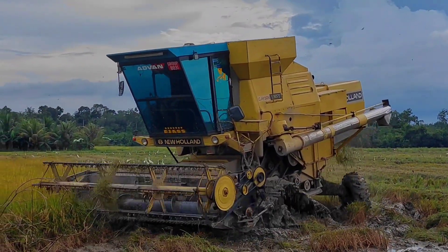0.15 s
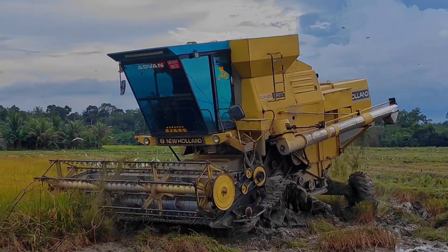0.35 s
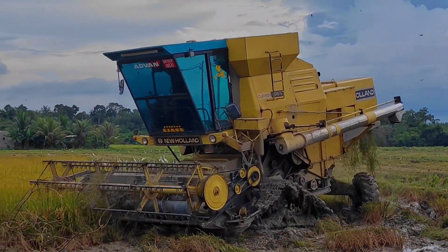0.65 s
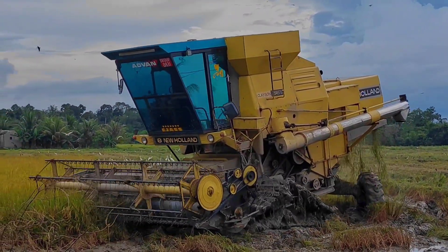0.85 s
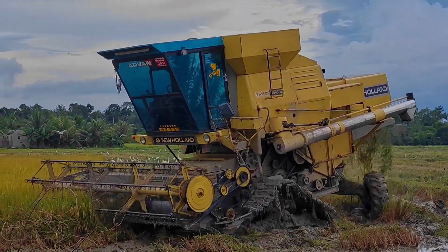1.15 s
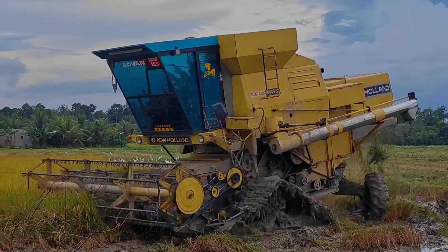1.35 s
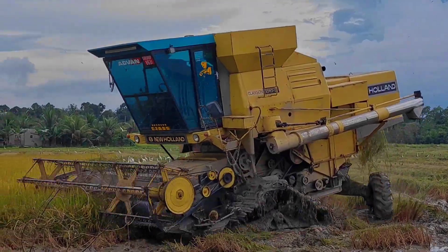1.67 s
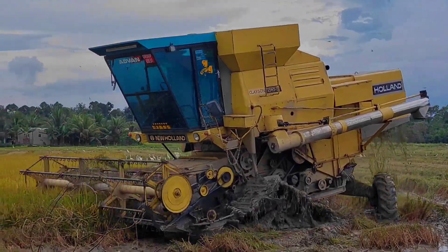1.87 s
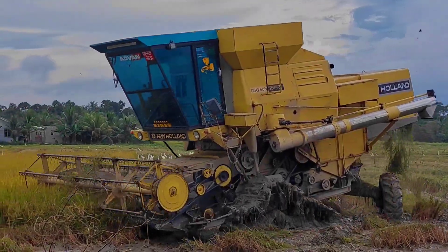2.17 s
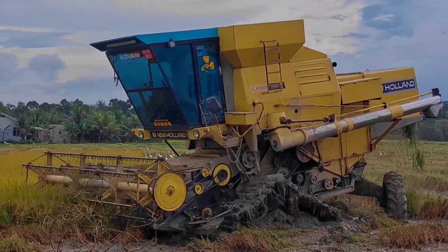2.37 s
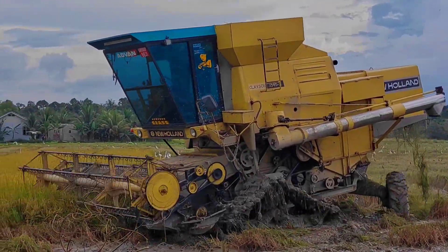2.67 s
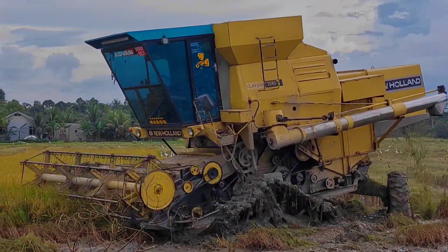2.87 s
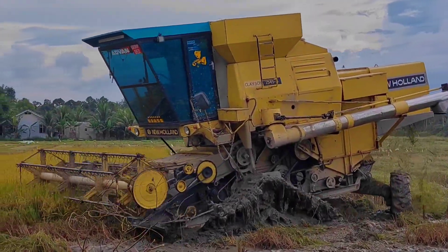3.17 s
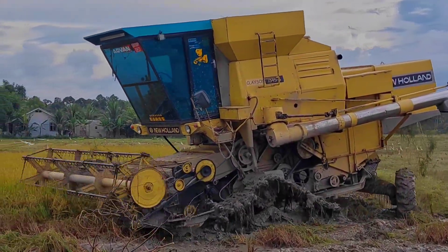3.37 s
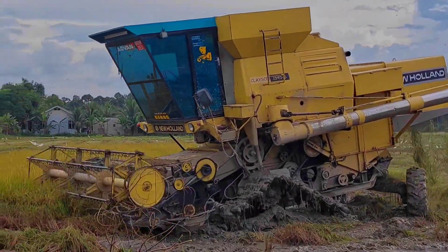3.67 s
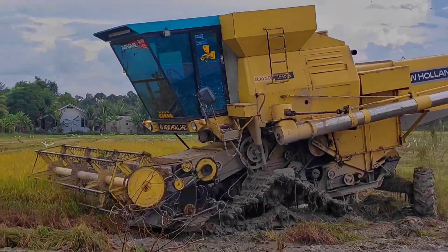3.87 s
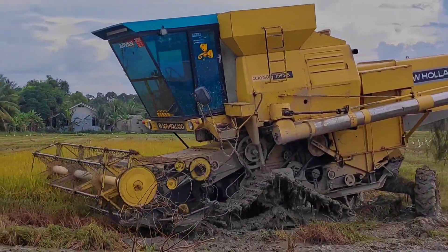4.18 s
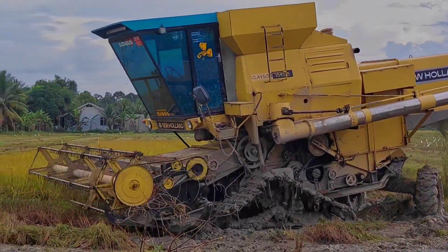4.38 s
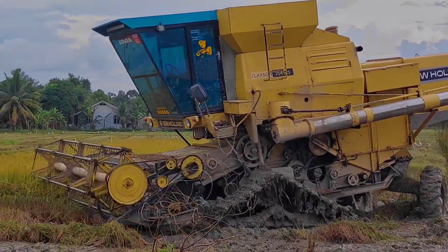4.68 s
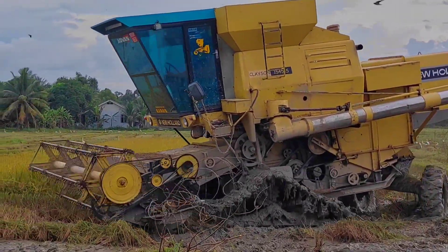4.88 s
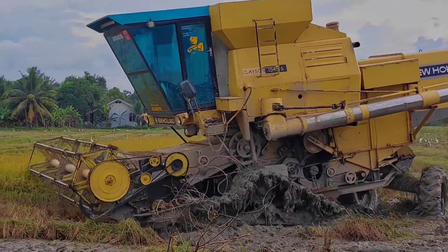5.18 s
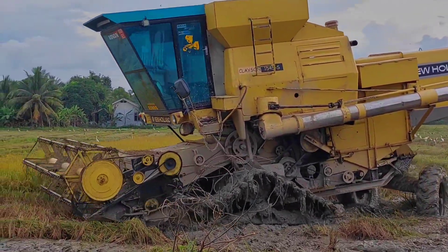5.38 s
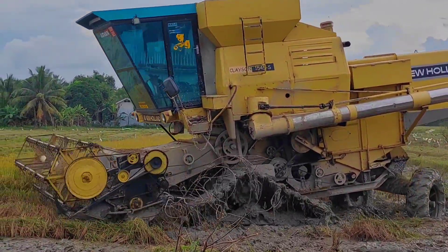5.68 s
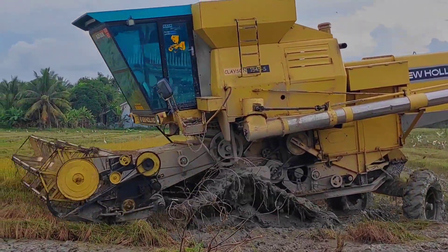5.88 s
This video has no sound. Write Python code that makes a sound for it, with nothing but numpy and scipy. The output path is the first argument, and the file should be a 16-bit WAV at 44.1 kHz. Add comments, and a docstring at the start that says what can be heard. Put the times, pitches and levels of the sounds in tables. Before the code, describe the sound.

A combine harvester crawls past with a loud, steady diesel drone, a low rumble and a growing metallic clatter.

```python
"""A muddy rice field: a combine harvester crawls past, its six-cylinder diesel held at working speed.
The exhaust radiates harmonics of the firing rate, the threshing gear rumbles, and fan and straw hiss.
Each firing is an impulse that makes the block thud and the engine covers ring at their resonances.
The clatter, with its echo off the wet ground, grows and changes colour as the engine bay comes round.
Two microphone ports hear the machine, and a limiter holds the peaks."""
import sys
import numpy as np
from scipy import signal
from scipy.fft import rfft, irfft
from scipy.io import wavfile
from scipy.ndimage import uniform_filter1d, minimum_filter1d

SR = 44100
rng = np.random.default_rng(int(sys.argv[2]) if len(sys.argv) > 2 else 0)


def write(x):
    x = np.atleast_2d(x).T
    wavfile.write(sys.argv[1], SR, np.round(np.clip(x, -1, 1) * 32767).astype(np.int16))


N = 266364
TIME = np.arange(N) / SR
HZ = np.fft.rfftfreq(N, 1 / SR)

# governed engine speed: time_s, firing_rate_hz
FIRING_RATE = [(0.0, 119.1), (0.5, 118.8), (1.01, 119.19), (1.51, 119.46), (2.01, 119.51), (2.52, 119.41),
               (3.02, 118.94), (3.52, 119.11), (4.03, 119.47), (4.53, 118.6), (5.03, 118.44),
               (5.54, 118.66), (6.04, 118.71)]
# relative strength of each cylinder, in firing order: knock_db, tick_db
CYLINDER_LEVELS = [(-1, 0.5), (0.5, -39), (-3, -31), (4.5, 2.5), (-4.5, -36), (2, -3.5)]
# engine cover resonances: centre_hz, width_hz, steady_drive_ratio, level_db, swell_ratio,
# facing_s, facing_gain_db
COVER_RESONANCES = [(3176, 490, 0.69, -36.5, 0.055, 1.9, 5.5), (3597, 245, 0.35, -28, 0.88, 5.7, 1.5),
                    (4029, 234, 0.037, -29.5, 0.92, 3.25, 5), (4720, 430, 0.04, -31.5, 1.4, 4.8, 5),
                    (7520, 220, 0.035, -41, 0.74, 2.9, -3)]


def amp(db):
    """Amplitude ratio of a level in decibels."""
    return 10 ** (np.asarray(db) / 20)


def unit(x):
    """Normalisation to an rms of one."""
    return x / np.sqrt(np.mean(x ** 2) + 1e-20)


def curve(points):
    """Linear interpolation of a timed table at every sample."""
    return np.interp(TIME, *np.transpose(points))


def read(points, hz):
    """Interpolation of a table on a log-frequency axis."""
    point_hz, value = np.transpose(points)
    return np.interp(np.log(hz + 1), np.log(point_hz + 1), value)


def wander(rate_hz):
    """Slow random fluctuation: low-passed noise with an rms of one."""
    return unit(irfft(rfft(rng.standard_normal(N)) / (1 + (HZ / rate_hz) ** 4), N))


def colour(x, spectrum):
    """Minimum-phase filter of unit power: it is causal, so ringing follows its blow."""
    log_gain = np.log(amp(read(spectrum, abs(np.fft.fftfreq(4096, 1 / SR)))))
    response = np.exp(np.conj(signal.hilbert(log_gain)))
    taps = np.fft.ifft(response).real[:2048]
    return signal.oaconvolve(x, taps[None] / np.linalg.norm(taps), axes=1)[:, :N]


def ring(x, hz, width_hz):
    """Resonance as a steep-sided pass band."""
    edges_hz = [hz - width_hz / 2, hz + width_hz / 2]
    return signal.sosfilt(signal.butter(2, edges_hz, "bandpass", fs=SR, output="sos"), x)


def port_noise():
    """Partial coherence: white noise at two ports, alike in the bass and less so in the treble."""
    # likeness of left and right: frequency_hz, correlation
    coherence = [(50, .99), (250, .96), (500, .87), (1000, .5), (1400, .25), (2200, .4), (4700, .5),
                 (7000, .2), (15000, .15)]
    correlation = np.clip(read(coherence, HZ), 0, 1)
    shared, apart = rfft(rng.standard_normal((2, N)))
    mid, side = shared * np.sqrt((1 + correlation) / 2), apart * np.sqrt((1 - correlation) / 2)
    return irfft(np.array([mid + side, mid - side]), N)


def bursts(at, size, rise_s, decay_s):
    """Envelope of damped blows at the given samples; overlapping blows add in power."""
    train, t = np.zeros(N), np.arange(SR // 25) / SR
    train[at] = size ** 2
    shape = (1 - np.exp(-t / rise_s)) * np.exp(-t / decay_s)
    return np.sqrt(abs(signal.oaconvolve(train, (shape / shape.max()) ** 2)[:N]))


def firings(cycles, lag_cycles=0.21):
    """Phase lag: the samples at which knocks fall, each a little after its exhaust pulse."""
    return np.flatnonzero(np.diff(np.floor(cycles - lag_cycles)) > 0)


def turned(corner_s=2.7, turn_s=1):
    """Aspect of the passing machine: 0 at its front, 1 at its flank."""
    return 1 / (1 + np.exp((corner_s - TIME) / turn_s))


def passing(front_db, corner_db, flank_db):
    """Directivity: a source's gain as the aspect moves from front over corner to flank."""
    return amp(np.interp(turned(), [0, 0.5, 1], [front_db, corner_db, flank_db]))


def bay_swell():
    """Radiation from the engine bay, in decibels above its average."""
    # clatter escaping from the bay: time_s, relative_db
    bay_level = [(0, -28.8), (0.6, -27.8), (1.25, -28.6), (2.6, -25.9), (2.95, -23.0), (3.2, -24.5),
                 (3.47, -21.7), (3.95, -25.3), (4.65, -20.7), (5.05, -22.3), (5.45, -20.5), (5.85, -26.6),
                 (6.04, -23.1)]
    level_db = curve(bay_level)
    return level_db - level_db.mean()


def exhaust(cycles, flutter=0.16, lope=0.039):
    """Periodic gas pulses radiate harmonics; unequal cylinders modulate the fundamental into a lope."""
    # fundamental: time_s, relative_db
    drone_level = [(0, -5.8), (1.4, -5.6), (1.65, -6.7), (2.7, -6.8), (3.4, -7.6), (3.85, -6.0),
                   (4.5, -8.0), (5.35, -7.6), (6.0, -5.4)]
    # second harmonic: time_s, level_db
    octave_level = [(0, -29.3), (0.55, -22.9), (0.9, -28.9), (1.6, -27.6), (2.0, -24.6), (2.9, -26.2),
                    (3.3, -21.1), (3.7, -26.5), (4.3, -23.9), (6.0, -27.7)]
    # higher harmonics: harmonic_number, front_db, flank_db, flank_sign (-1 cancels on the way round)
    overtones = [(3, -52, -39, 1), (4, -33.5, -30, -1), (5, -38, -49, 1), (6, -34, -30.5, -1),
                 (8, -42.5, -45.5, 1), (9, -43.5, -39.5, 1)]
    phase, view = 2 * np.pi * cycles, np.pi / 2 * turned()
    engine_phase = phase / len(CYLINDER_LEVELS)
    uneven = 1 + lope * (np.cos(2 * engine_phase) + 1.6 * np.cos(engine_phase))
    tone = amp(curve(drone_level) + 0.64) * uneven * np.cos(phase)
    partials = [(2, amp(curve(octave_level)))]
    for k, front_db, flank_db, sign in overtones:
        partials.append((k, amp(front_db) * np.cos(view) + sign * amp(flank_db) * np.sin(view)))
    for k, height in partials:
        tone += height * (1 + flutter * wander(4.9)) * np.cos(k * phase + 2 * np.pi * rng.random())
    return np.sqrt(2) * tone


def threshing(swell_db=1):
    """Random excitation: drum, sieves and tracks churn crop and mud into a low rumble."""
    # rumble: frequency_hz, density_db
    rumble_spectrum = [(20, -34), (35, -16), (62, -5.5), (90, 2), (150, -2), (210, -2), (300, -4),
                       (400, -7.5), (520, -13), (800, -15.5), (1500, -27.5), (4000, -90.5)]
    gain = passing(front_db=-19, corner_db=-17.5, flank_db=-20.5) * amp(swell_db * wander(19))
    return gain * unit(colour(port_noise(), rumble_spectrum))


def block_face(cycles, spectrum, throb=0.34, periodic_share=0.42):
    """Forced vibration: noise throbs with each firing; what repeats every six makes close-set lines."""
    cylinders, orders = len(CYLINDER_LEVELS), np.arange(2049)
    thud = unit(colour(port_noise() * (1 + throb * np.cos(2 * np.pi * cycles)), spectrum))
    line_hz = orders * FIRING_RATE[0][1] / cylinders
    heights = amp(read(spectrum, line_hz)) * (orders % cylinders > 0)  # skips the firing harmonics
    period = irfft(heights * np.exp(2j * np.pi * rng.random(len(orders))))
    lines = unit(np.interp(cycles / cylinders % 1, np.arange(len(period)) / len(period), period))
    return np.sqrt(1 - periodic_share) * thud + np.sqrt(periodic_share) * lines


def block(cycles):
    """Directional radiation: the thud of the block's front gives way to that of its flank."""
    # front face: frequency_hz, density_db
    front_spectrum = [(200, -18), (400, -12.5), (590, 4.5), (740, -4.5), (850, -5), (940, 5.5), (1060, 1),
                      (1200, -14.5), (1360, -3.5), (1550, -13), (1750, -9.5), (1950, -32.5), (2600, -12),
                      (6000, -61)]
    # flank: frequency_hz, density_db
    flank_spectrum = [(200, -25), (440, -1.5), (560, -8), (700, 5), (860, -3.5), (950, 2.5), (1080, -4),
                      (1200, -19.5), (1360, -6), (1550, -11.5), (1750, -11.5), (1950, -16), (2600, -18.5),
                      (6000, -70)]
    view = np.pi / 2 * (TIME / TIME[-1]) ** 1.17
    front, flank = block_face(cycles, front_spectrum), block_face(cycles, flank_spectrum)
    gain = passing(front_db=-27, corner_db=-25.5, flank_db=-24)
    return gain * (np.cos(view) * front + np.sin(view) * flank)


def diesel_knock(cycles, scatter_db=2.2, load_db=1.1, steady_drive=1.3, tick_level_db=-38.5):
    """Impulsive excitation: each firing, at its own strength, knocks, ticks and rings the covers."""
    # knock: frequency_hz, density_db
    knock_spectrum = [(700, -37), (1900, -8), (2250, 4), (2600, -1), (2850, 1.5), (3300, 2), (3900, -8.5),
                      (4300, 3), (4500, -6), (5200, -3), (5600, -12.5), (6500, -9.5), (8100, -23.5),
                      (16000, -19.5)]
    # bright tick: frequency_hz, density_db
    tick_spectrum = [(2000, -28), (4700, 8), (6000, 15), (7100, 9), (7600, -12), (8100, 11), (9450, 7),
                     (10650, 6.5), (11200, -1), (11700, 7), (12250, 10), (12650, 11), (13500, -12),
                     (16000, -80)]
    at = firings(cycles)
    knock_db, tick_db = np.array(CYLINDER_LEVELS)[np.arange(len(at)) % len(CYLINDER_LEVELS)].T
    force_db = scatter_db * np.clip(rng.standard_normal(len(at)), -2, 1.5) + load_db * wander(22)[at]
    blows = bursts(at, amp(knock_db + force_db), rise_s=.0004, decay_s=.0015)
    ticks = bursts(at, amp(tick_db + force_db), rise_s=.002, decay_s=.0013)
    knock = unit(colour(port_noise() * np.hypot(blows, steady_drive), knock_spectrum))
    bright = amp(tick_level_db + bay_swell()) * unit(colour(port_noise() * ticks, tick_spectrum))
    return passing(front_db=-28, corner_db=-25, flank_db=-27.5) * knock + covers(blows) + bright


def cover_levels(facing_width_s=0.65):
    """Directivity in decibels: each cover follows the bay's swell and shifts as it faces the ports."""
    swell_db = bay_swell()
    return np.array([db + follow * swell_db + gain_db * np.exp(-((TIME - at_s) / facing_width_s) ** 2)
                     for *_, db, follow, at_s, gain_db in COVER_RESONANCES])


def covers(blows):
    """Panel resonance: blows and steady shaking drive a cluster of modes and one that rings longer."""
    # each cover's lightly damped mode: pitch_hz, width_hz, re_cluster_db
    singing_modes = [(3137, 93, -3), (3659, 67, -5.5), (4028, 74, -6), (4702, 130, -5.5), (7525, 90, -5.5)]
    shaking, out = port_noise(), 0
    for cover, mode, level_db in zip(COVER_RESONANCES, singing_modes, cover_levels()):
        hz, width_hz, steady_drive = cover[:3]
        mode_hz, mode_width_hz, mode_db = mode
        drive = np.hypot(blows, steady_drive)
        cluster = unit(ring(shaking * drive, hz, width_hz))
        singing = unit(ring(shaking[:, ::-1] * drive, mode_hz, mode_width_hz))
        out = out + amp(level_db) * unit(cluster + amp(mode_db) * singing)
    return out


def ground_echo(x, reflection=0.27, delay_s=.00632, shrink_s_per_s=.000068):
    """Interference with the ground reflection: its delay shrinks, so a fine comb slides slowly up."""
    echo_time = TIME - (delay_s - shrink_s_per_s * TIME)
    return x + reflection * np.array([np.interp(echo_time, TIME, port) for port in x])


def fan_and_straw(level_db=-35.5, flicker_db=2.0, swell_share=0.22):
    """Broadband noise: the hiss of cooling fan and straw changes colour as the front turns away."""
    # hiss from the front: frequency_hz, density_db
    front_spectrum = [(1000, -30), (3000, -8), (5000, -30), (5900, -15), (6700, 19.5), (7500, 15),
                      (8100, 10.5), (8900, 16), (9900, 8), (11500, 13), (14500, 10.5), (16000, -45)]
    # hiss from the flank: frequency_hz, density_db
    flank_spectrum = [(3000, -12), (5000, -9), (6000, 6), (7000, -3.5), (8100, 0), (9500, -3), (11200, 0.5),
                      (12600, 4.5), (14000, -11), (16000, -16)]
    view = np.pi / 2 * turned() ** 2
    front, flank = unit(colour(port_noise(), front_spectrum)), unit(colour(port_noise(), flank_spectrum))
    gain = amp(level_db + swell_share * bay_swell() + flicker_db * wander(17))
    return gain * (np.cos(view) * front + np.sin(view) * flank)


def hard_knocks(cycles, usual_ring_db=-12, usual_crack_db=-35, flank_chance=0.4):
    """Strong impulses crack and ring the covers: at set times, and by chance on the loudest cylinder."""
    # knocks that stand out: start_s, relative_ring_db, relative_crack_db
    standouts = [(1.8188, -12, -32), (2.5476, -7, -35), (2.9502, -7, -31), (3.4052, -6, -30),
                 (3.455, -4, -33), (3.9584, -7, -29), (4.4119, -5, -28), (4.4623, -6, -26),
                 (4.6139, -4, -26), (4.8668, -6, -25), (5.2215, -5, -27), (5.3233, -5, -21),
                 (5.3974, -7, -23), (5.4974, -7, -21), (5.5248, -4, -25)]
    # crack: frequency_hz, density_db
    crack_spectrum = [(2000, -20), (5000, 0), (6800, -3), (7600, 2), (8200, -4), (9500, 0), (11200, 2),
                      (12500, 4), (14000, -2), (16000, -7)]
    loudest = firings(cycles)[np.argmax(np.array(CYLINDER_LEVELS)[:, 0])::len(CYLINDER_LEVELS)]
    usual = loudest[rng.random(len(loudest)) < flank_chance * turned()[loudest]]
    swell_db = bay_swell()[usual]
    start_s, ring_db, crack_db = np.transpose(standouts)
    at = np.r_[usual, np.round(start_s * SR).astype(int)]
    metal = unit(covers(1) / np.linalg.norm(amp(cover_levels()), axis=0))  # held at an even level
    ringing = bursts(at, amp(np.r_[usual_ring_db + swell_db, ring_db]), rise_s=.0012, decay_s=.0028)
    cracks = bursts(at, amp(np.r_[usual_crack_db + swell_db, crack_db]), rise_s=.0015, decay_s=.0016)
    return amp(-6) * metal * ringing + amp(8) * colour(port_noise(), crack_spectrum) * cracks


def scene():
    """Superposition: the sources add, and reach the two ports at different strengths and phases."""
    # level between the ports: frequency_hz, left_minus_right_db
    balance = [(60, 0), (250, -.7), (500, -1.7), (800, -3), (1200, -1), (1800, -1.5), (2700, -4.5),
               (3600, -7), (4700, -5), (6500, -1), (7600, -5), (8500, 1), (10500, -.5), (12500, -9),
               (15000, -9)]
    # phase between the ports: frequency_hz, left_lead_rad
    phase_lead = [(60, .15), (120, .24), (240, .24), (400, .06), (1400, .45), (2300, -.7), (3000, 1),
                  (3600, -.7), (4050, -.3), (4750, .9), (7500, .25), (12500, -.9)]
    cycles = .38 + np.cumsum(curve(FIRING_RATE)) / SR  # one cycle a firing
    clatter = ground_echo(diesel_knock(cycles) + hard_knocks(cycles))
    machine = exhaust(cycles) + threshing() + block(cycles) + clatter + fan_and_straw()
    left = amp(read(balance, HZ) / 2) * np.exp(.5j * read(phase_lead, HZ))
    return irfft(rfft(machine) * np.array([left, 1 / left]), N)


def record(dry, ceiling=1.04, cutoff_hz=15900):
    """Peak limiting: the gain dips briefly at each peak, overshoots clip, and a low-pass follows."""
    headroom = np.minimum(1, ceiling / (abs(dry).max(0) + 1e-9))
    gain = uniform_filter1d(minimum_filter1d(headroom, size=300), size=300)
    low_pass = signal.firwin(511, cutoff_hz, window=("kaiser", 7), fs=SR)
    return signal.oaconvolve(np.clip(dry * gain, -1, 1), low_pass[None], "same")


dry = scene()
out = record(dry)
write(out)
```